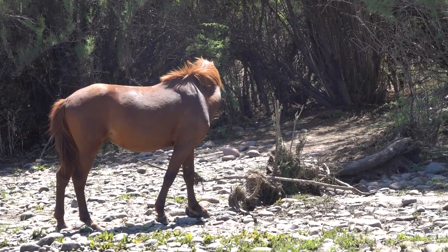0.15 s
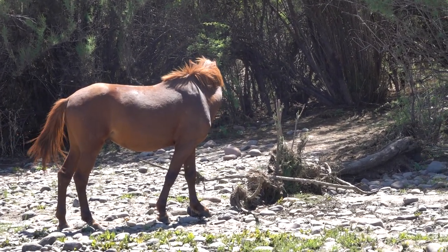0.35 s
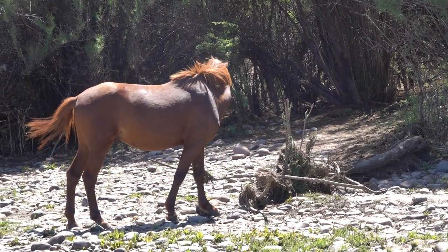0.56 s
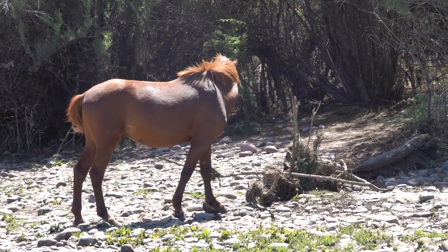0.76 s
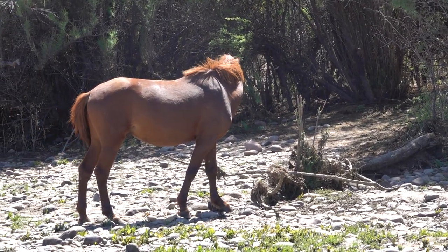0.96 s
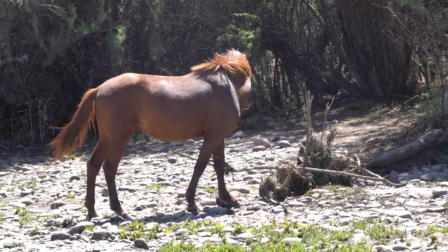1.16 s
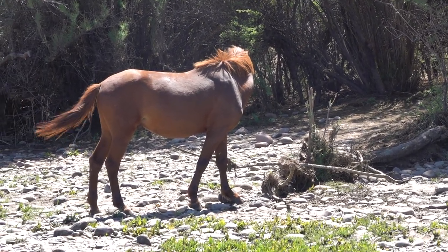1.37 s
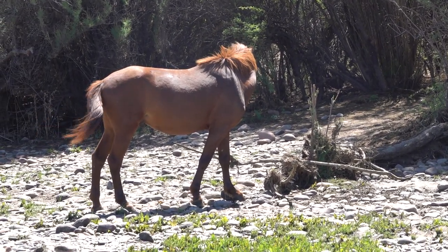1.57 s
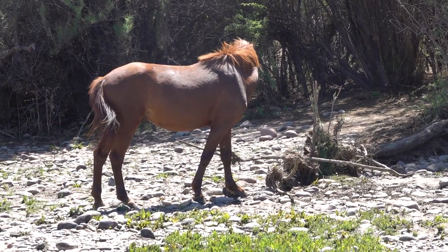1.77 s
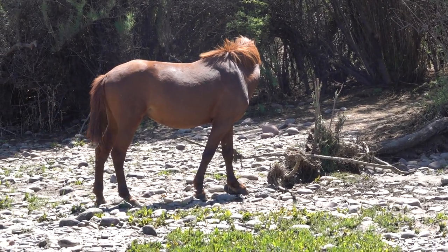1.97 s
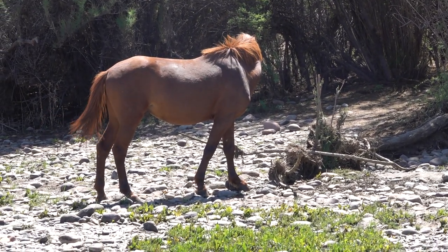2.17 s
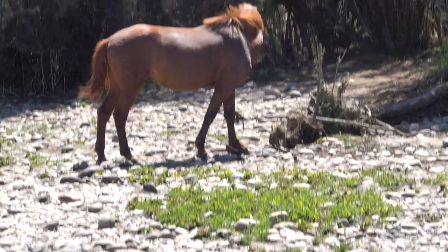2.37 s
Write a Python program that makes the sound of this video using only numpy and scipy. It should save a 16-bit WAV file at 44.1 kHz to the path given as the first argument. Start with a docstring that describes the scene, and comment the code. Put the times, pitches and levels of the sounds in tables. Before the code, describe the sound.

Wind noise dominates for 2.5 seconds: deep rumble, buffeting and fluttering, with sharp puffs around 0.3, 0.55-0.75, 1.1 and 1.6, and a strong gust at 2.4-2.5. A faint distant bird gives a buzzy whistle at 0.2-0.45, a rapid trill from 0.65 to 1.45, and a rasp near 1.95. From 1.4 a hand rubs and scuffs the housing, strongest at 1.7 and 2.05-2.2, ticking at 2.37. Water and leaves rush faintly.

```python
"""Gusty wind buffets both ports of a hand-held camera on a stony river bank: noise shaped by eddies and puffs.
In the second half a hand shifts on the camera: friction slips rub and scuff the housing, and it ticks.
A distant songbird gives a buzzy whistle, a rasp and a long trill: swept tones and noise bands with an echo.
Beneath lies a faint rush of water and leaves: coloured noise."""
import sys
import numpy as np
from scipy import signal
from scipy.fft import rfft, irfft, next_fast_len
from scipy.io import wavfile
from scipy.ndimage import uniform_filter1d, map_coordinates

SR = 44100
rng = np.random.default_rng(int(sys.argv[2]) if len(sys.argv) > 2 else 0)


def unload_audio(sound):
    """Save the sound as a 16-bit wav file, at the path given as the first command line argument."""
    columns = np.transpose(np.atleast_2d(sound))
    # keep every value between -1 and 1, then stretch to whole-number steps
    steps = np.round(np.clip(columns, -1, 1) * 32767)
    wavfile.write(sys.argv[1], SR, steps.astype(np.int16))


N = 111573
T = np.arange(N) / SR
SIDES = np.array([[.5], [-.5]])  # splits a left-right difference evenly


def amp(db):
    """The decibel law: level to amplitude gain."""
    return 10 ** (np.asarray(db) / 20)


def unit(x):
    """Power normalisation: scale to rms 1."""
    return x / np.sqrt(np.mean(x ** 2) + 1e-20)


def along(points, hz):
    """Interpolation of (frequency [Hz], value) points on a logarithmic frequency axis."""
    f, v = np.transpose(points)
    return np.interp(np.log(hz + 1), np.log(f + 1), v)


def curve(rows, axis=1):
    """Linear interpolation in time of one column of a timed table."""
    cols = np.transpose(rows)
    return np.interp(T, cols[0], cols[axis])


def wobble(rate):
    """Random modulation: a smooth curve through rate chance values a second."""
    return map_coordinates(rng.standard_normal(4096), [T * rate], mode="wrap")


def filtered(x, response):
    """Linear filtering: the spectrum of x times a response of frequency."""
    m = next_fast_len(N + 8192)
    return irfft(rfft(x, m) * response(np.fft.rfftfreq(m, 1 / SR)), m)[..., :N]


def ports(pair, colour, alike):
    """Coherence: two unrelated signals, coloured, mix into left and right of a given likeness, rms 1."""
    def response(hz):
        angle = np.arccos(np.clip(along(alike, hz), -.99, .99)) / 2
        return amp(along(colour, hz)) * [np.cos(angle), np.sin(angle)]
    mid, side = filtered(pair, response)
    return unit(np.array([mid + side, mid - side]))


def leading(x, phase):
    """Interaural-style phase: the left port leads the right by (frequency [Hz], lead [rad])."""
    return filtered(x, lambda hz: np.exp(1j * along(phase, hz) * SIDES))


def white():
    """White noise: two unrelated signals of flat spectrum."""
    return rng.standard_normal((2, N))


def steadied(x, size):
    """Envelope equalisation: noise over its running rms, size samples long."""
    return x / np.sqrt(np.abs(uniform_filter1d(np.mean(x ** 2, axis=0), size)) + 1e-6)


# deep rumble of the wind: (time [s], relative level [dB])
RUMBLE_LEVEL = [(0.0, -20), (0.47, -26), (0.51, -16), (0.57, -28.5), (0.61, -16.5), (0.7, -27.5),
                (0.91, -23.5), (1.1, -26), (1.3, -32.5), (1.5, -23), (1.72, -33), (1.88, -23.5),
                (2.3, -24.5), (2.41, -17.5), (2.53, -29.5)]
# its spectrum: (frequency [Hz], density [dB per Hz])
RUMBLE_SPECTRUM = [(15, -17.5), (27, -4.5), (38, -9.5), (52, -2.5), (70, -1.5), (100, 0), (140, -13),
                   (260, -41.5), (600, -84)]


def rumble():
    """Large-scale turbulence: deep noise almost alike at both ports."""
    noise = steadied(ports(white(), RUMBLE_SPECTRUM, [(60, 0.99)]), size=2600)
    return noise * amp(curve(RUMBLE_LEVEL) + 0.76)


# buffeting of the wind: (time [s], relative level [dB])
BUFFET_LEVEL = [(0.0, -17), (0.03, -27), (0.12, -25.5), (0.3, -20), (0.54, -19), (0.62, -15), (0.86, -29),
                (0.9, -19.5), (1.01, -28), (1.13, -17.5), (1.16, -32.5), (1.32, -26), (1.39, -23),
                (1.63, -25.5), (1.66, -19.5), (2.32, -21), (2.4, -24.5), (2.42, -17), (2.51, -17),
                (2.53, -29)]
# its spectrum: (frequency [Hz], density [dB per Hz])
BUFFET_SPECTRUM = [(50, -33), (90, -14.5), (125, -0.5), (200, -2), (280, -8.5), (400, -24), (700, -49),
                   (2000, -87)]


def buffet():
    """Mid-scale turbulence: gusting noise, slightly less alike at the two ports."""
    noise = steadied(ports(white(), BUFFET_SPECTRUM, [(200, 0.92)]), size=1500)
    return noise * amp(curve(BUFFET_LEVEL) - 1.1)


# flutter of small eddies: (time [s], relative level [dB])
FLUTTER_LEVEL = [(0.0, -35), (0.22, -38.5), (0.28, -30.5), (0.42, -38.5), (0.57, -32.5), (0.74, -28.5),
                 (0.83, -35), (1.04, -32.5), (1.16, -39), (1.33, -49), (1.41, -36), (1.77, -34),
                 (1.95, -30), (2.25, -28.5), (2.41, -34), (2.46, -24.5), (2.53, -36)]
# its spectrum: (frequency [Hz], density [dB per Hz])
FLUTTER_SPECTRUM = [(120, -35.5), (230, -4.5), (310, 0.5), (430, -4.5), (560, -13.5), (800, -28.5),
                    (1500, -46), (4000, -61.5), (12000, -89.5)]


def flutter():
    """Small-scale turbulence: noise in chance bursts, the least alike at the two ports."""
    eddies = white() * amp(4.6 * wobble(95))
    noise = steadied(ports(eddies, FLUTTER_SPECTRUM, [(300, 0.79), (700, 0.75)]), size=2000)
    return noise * amp(curve(FLUTTER_LEVEL) + 2)


# sharp puffs on the ports: (time [s], relative level [dB])
PUFF_EVENTS = [(.274, -18), (.311, -20), (.553, -18), (.621, -17), (.657, -15), (.666, -14), (.674, -12),
               (.729, -17), (.766, -22), (.948, -19), (1.055, -17), (1.099, -12), (1.134, -16), (1.59, -18),
               (2.46, -13), (2.497, -12)]
# spectrum of their noise: (frequency [Hz], density [dB per Hz])
PUFF_SPECTRUM = [(120, -19), (230, -7), (330, -6), (450, -3.5), (580, -15), (800, -24), (1500, -48.5),
                 (4000, -74.5), (12000, -97)]
PUFF_S, PUFF_DB = .003, -7  # Gaussian width and trim of the noise burst
PUSH_S, PUSH_DB = .0008, -1  # width and trim of the pressure pulse


def puffs():
    """Pressure impulse: each puff is a Gaussian burst of noise with a sharp pulse common to both ports."""
    bursts = sum(amp(db + PUFF_DB) * np.exp(-.5 * ((T - s) / PUFF_S) ** 2) for s, db in PUFF_EVENTS)
    noise = steadied(ports(white(), PUFF_SPECTRUM, [(300, 0.99)]), size=600) * bursts
    push = lambda u: (1 - u ** 2) * np.exp(-.5 * u ** 2)
    return noise + sum(amp(db + PUSH_DB) * push((T - s) / PUSH_S) for s, db in PUFF_EVENTS)


# eddies reach the left port first until the camera turns: (frequency [Hz], lead of the left port [rad])
EDDY_LEAD = [(40, .3), (90, .55), (170, 1), (300, 1.5), (500, 1.7), (900, 1.5)]
TURN_AT_S, TURN_S = 2.41, .03


def wind():
    """Convection of eddies: they pass one port, then the other; the ports trade places at the turn."""
    pair = rumble() + buffet() + flutter() + puffs()
    to_ends = np.minimum(T, T[-1] - T)
    pair = pair * np.sin(np.clip(to_ends / .008, 0, 1) * np.pi / 2) ** 2  # 8 ms fades at both ends
    left_first = leading(pair, EDDY_LEAD)
    turned = np.clip((T - TURN_AT_S) / TURN_S, 0, 1) * np.pi / 2
    return np.cos(turned) ** 2 * left_first + np.sin(turned) ** 2 * left_first[::-1]


# response of the camera housing: (frequency [Hz], density [dB per Hz])
HOUSING_SPECTRUM = [(200, -14.5), (500, 4), (800, -4), (1100, 3), (1400, 3), (1750, -2), (2100, -8),
                    (2550, -18.5), (2850, -13.5), (3050, -22), (3300, -16), (3700, -22), (4200, -36.5),
                    (5200, -29), (6500, -43), (8000, -48), (11000, -49.5), (15500, -51)]
# balance of the ports: (frequency [Hz], left minus right [dB])
HOUSING_BALANCE = [(300, -1.5), (700, -7), (1300, -3), (2400, -8.5), (4400, -16), (8000, -0.5)]
# coherence of the ports: (frequency [Hz], left-right likeness [1 = alike])
HOUSING_COHERENCE = [(400, 0.9), (700, 1), (1100, 0.98), (1800, 0.91), (2550, 0.96), (3100, 0.28),
                     (6800, 0.4), (12000, .6)]
# phase through the housing: (frequency [Hz], lead of the left port [rad])
HOUSING_LEAD = [(600, 1.6), (1000, .85), (1500, 0), (2100, -.8), (2900, -1.4), (3500, -2.7), (5000, -3),
                (6500, -5.3), (9000, -6.1)]


def slips(rate, scatter_db, smooth):
    """Stick-slip friction: rate uneven slips a second over a smooth hiss, heard through the housing."""
    sizes = amp(scatter_db * np.clip(rng.standard_normal(N), -2, 2))
    grains = (rng.random(N) < rate / SR) * sizes * np.sign(white())
    sound = ports(unit(grains) + smooth * white(), HOUSING_SPECTRUM, HOUSING_COHERENCE)
    sound = leading(sound, HOUSING_LEAD)
    return unit(filtered(sound, lambda hz: amp(along(HOUSING_BALANCE, hz) * SIDES)))


# rubbing of the hand: (time [s], level [dB])
RUB_LEVEL = [(0, -84), (1.3, -68), (1.44, -47.5), (1.6, -51), (1.73, -40.5), (1.79, -40), (1.85, -32.5),
             (1.93, -41), (2.01, -34), (2.13, -39.5), (2.24, -32.5), (2.33, -38), (2.42, -38),
             (2.47, -47.5)]
SLIPS_PER_S, SLIP_SCATTER_DB, RUB_SMOOTH, RUB_SWAY_DB = 1600, 3.5, .45, 1.5


def rub():
    """Sustained friction: a steady stream of slips whose level sways."""
    noise = steadied(slips(SLIPS_PER_S, SLIP_SCATTER_DB, RUB_SMOOTH), size=1200)
    return noise * amp(curve(RUB_LEVEL) + RUB_SWAY_DB * wobble(50))


# scuffs of the hand: (time [s], length [s], level [dB], brightness [dB per octave])
SCUFF_EVENTS = [(1.383, 0.0039, -36, -15), (1.42, 0.022, -36, -3), (1.635, 0.0069, -33.5, -6.5),
                (1.685, 0.0059, -34, 3), (1.7119, 0.0048, -22, -1.5), (1.721, 0.011, -32, -0.5),
                (1.828, 0.011, -49, 7), (1.967, 0.0049, -38, 0), (1.972, 0.0078, -35, 4),
                (2.052, 0.003, -33.5, 8), (2.061, .003, -31.5, 4), (2.0712, 0.0023, -23, -4),
                (2.0763, 0.0037, -20, 4), (2.083, 0.011, -27.5, -1.5), (2.162, 0.0093, -33.5, 3),
                (2.185, 0.0098, -29.5, 2), (2.192, 0.014, -23.5, -2.5), (2.211, 0.0034, -25, -4),
                (2.2152, 0.006, -21, -1), (2.225, .012, -37, 4.5)]
SCUFF_ATTACK_S, SCUFF_T60_S, SCUFF_COLOUR_DB = .001, .024, 2.5
SCUFF_SLIPS_PER_S, SCUFF_SCATTER_DB, SCUFF_SMOOTH = 1300, 3, .2


def scuffs():
    """Catch and release: short friction bursts with exponential decay, each with its own colour."""
    rough = slips(SCUFF_SLIPS_PER_S, SCUFF_SCATTER_DB, SCUFF_SMOOTH)
    out = 0
    for s, length, db, tilt_db in SCUFF_EVENTS:
        spot = SCUFF_COLOUR_DB * rng.standard_normal(28)  # chance colour of this scuff
        spot_hz = np.geomspace(500, 8000, len(spot))

        def colour(hz):
            tilt = tilt_db * np.log2(np.clip(hz, 500, 5000) / 1400)
            return amp(tilt + np.interp(hz, spot_hz, spot))
        attack = np.clip((T - s) / SCUFF_ATTACK_S, 0, 1)
        decay = amp(-60 * np.maximum(T - s - length, 0) / SCUFF_T60_S)
        out = out + amp(db) * attack * decay * steadied(filtered(rough, colour), size=220)
    return out


# hiss of sliding skin: (time [s], level [dB])
SLIDE_LEVEL = [(0, -92), (1.3, -76.5), (1.42, -69.5), (1.6, -73.5), (1.685, -65), (1.76, -74.5),
               (2.0, -61.5), (2.17, -59), (2.31, -63), (2.41, -54), (2.47, -59.5)]
# its spectrum: (frequency [Hz], density [dB per Hz])
HISS_SPECTRUM = [(2000, -16), (3500, 10.5), (5500, 7), (7500, 1.5), (9000, 0), (11000, 2), (12500, -3),
                 (14500, 2.5), (16000, -3.5)]
HISS_SWAY_DB = .9


def slide():
    """Fine-grained friction: skin sliding gives a high, flickering noise."""
    grain = white() * amp(1.8 * wobble(280))
    hiss = ports(grain, HISS_SPECTRUM, [(4000, 0.14), (12000, 0.53)])
    return hiss * amp(curve(SLIDE_LEVEL) + HISS_SWAY_DB * wobble(59))


def hand():
    """Superposition: the dragging hand rubs, scuffs and slides."""
    return rub() + scuffs() + slide()


# small ticks of the housing under the fingers: (time [s], level [dB])
TICK_EVENTS = [(1.131, -51), (1.345, -56), (2.373, -36)]
TICK_T60_S = .02


def ticks():
    """Impulsive release: the housing gives a little under the grip, in bright, fast-decaying friction noise."""
    shape = sum(amp(db - 60 * np.abs(T - s) / TICK_T60_S) * (T > s) for s, db in TICK_EVENTS)
    noise = slips(SLIPS_PER_S, SLIP_SCATTER_DB, RUB_SMOOTH)
    return shape * unit(filtered(noise, lambda hz: np.clip(hz / 3000, 0, 1) ** 2))


def tone(hz):
    """Frequency modulation: a sine of rms 1 whose phase is the running sum of its pitch."""
    return np.sqrt(2) * np.sin(2 * np.pi * np.cumsum(hz) / SR)


def during(rows):
    """Gating: open between the first and last times of a table."""
    return (T > rows[0][0]) * (T < rows[-1][0])


# the whistle: (time [s], pitch [Hz], level [dB])
WHISTLE_PATH = [(.2005, 3520, -78), (.222, 3520, -61), (.26, 3520, -52.5), (.292, 3490, -58),
                (.312, 3490, -55.5), (.37, 3510, -58), (.38, 3350, -67), (.415, 3290, -63),
                (.445, 3150, -80)]
BUZZ_HZ, BUZZ_RISE_HZ, BUZZ_DIP_DB, WHISTLE_ROUGH_HZ = 68.7, 200, 15, 35


def whistle():
    """Joint amplitude and frequency modulation: quick pulses, each rising in pitch, make the buzz."""
    cycle = ((T - WHISTLE_PATH[0][0]) * BUZZ_HZ) % 1
    pulses = amp(-BUZZ_DIP_DB * np.cos(np.pi * cycle) ** 4)
    hz = curve(WHISTLE_PATH, axis=1) + BUZZ_RISE_HZ * (cycle - .5) + WHISTLE_ROUGH_HZ * wobble(300)
    return tone(hz) * amp(curve(WHISTLE_PATH, axis=2)) * pulses * during(WHISTLE_PATH)


# trill notes: (time [s], level [dB])
TRILL_NOTES = [(0.6468, -64), (0.6983, -61.5), (0.7432, -58.5), (0.791, -56.5), (0.8345, -56.5),
               (0.8822, -54), (0.927, -56), (0.9742, -55), (1.0223, -57.5), (1.067, -58), (1.1149, -57.5),
               (1.1644, -64), (1.2104, -59.5), (1.2597, -61), (1.3069, -58.5), (1.3566, -56.5),
               (1.405, -59), (1.4538, -57.5)]
# downward sweep of each note: (time from its start [s], pitch [Hz], level relative to the note [dB])
NOTE_SWEEP = [(0, 6300, -26), (.008, 5200, -14.5), (.014, 4700, -14), (.018, 4000, -22), (.021, 3720, -2),
              (.0265, 3560, 0), (.031, 3470, -18)]
NOTE_LEAD_S = 0.0205  # the sweep starts this long before the note's listed time
SWEEP_ROUGH, SWEEP_JITTER_PER_S = .32, 900


def trill():
    """Falling frequency sweeps: pitch jitter shrinks with the fall, so notes start rough and end clean."""
    song = 0
    for s, db in TRILL_NOTES:
        note = np.array(NOTE_SWEEP) + [s - NOTE_LEAD_S, 0, db]
        hz = curve(note, axis=1)
        jitter = SWEEP_ROUGH * (hz - hz.min()) * wobble(SWEEP_JITTER_PER_S)
        song = song + tone(hz + jitter) * amp(curve(note, axis=2)) * during(note)
    return song


# lone falling chips: (time [s], level [dB])
CHIP_EVENTS = [(.146, -73)]
CHIP_S, CHIP_START_HZ, CHIP_END_HZ = .014, 6000, 4000


def chips():
    """Linear chirp: a short falling tone under a half-sine envelope."""
    song = 0
    for s, db in CHIP_EVENTS:
        u = np.clip((T - s) / CHIP_S, 0, 1)
        song = song + amp(db) * np.sin(np.pi * u) * tone(np.interp(u, [0, 1], [CHIP_START_HZ, CHIP_END_HZ]))
    return song


# rasping notes: (time [s], length [s], centre [Hz], width [octaves], level [dB])
RASP_EVENTS = [(.376, .06, 3300, .1, -69), (.376, .06, 4600, .15, -71), (.366, .075, 6250, .09, -71.5),
                (1.193, .068, 6300, .19, -70), (1.935, .2, 5800, .11, -63)]
RASP_ROUGH_DB = 2.5


def rasps():
    """Band-limited noise: a narrow band with a fluctuating level is heard as a rasp."""
    song = 0
    for s, length, centre, width, db in RASP_EVENTS:
        band = lambda f: 1 / (1 + (np.log2((f + 1) / centre) / width) ** 2)
        noise = unit(filtered(rng.standard_normal(N), band))
        shape = np.sqrt(np.abs(np.sin(np.pi * np.clip((T - s) / length, 0, 1))))
        song = song + amp(db + RASP_ROUGH_DB * wobble(260)) * noise * shape
    return song


# direction of the bird: (frequency [Hz], lead of the left port [rad])
BIRD_LEAD = [(2500, 1.2), (3500, 1.7), (3900, 2), (4650, 5.4), (6000, 6.25)]
BIRD_ROOM_DB, TREES_T60_S = -13, 0.61  # level and decay time of the echo


def bird():
    """Direct and diffuse sound: the song, plus its convolution with the decaying echo of the trees."""
    song = whistle() + trill() + chips() + rasps()
    tail = white() * amp(-60 * T / TREES_T60_S)
    echo = signal.fftconvolve(song[None], tail / np.linalg.norm(tail[0]), axes=1)[:, :N]
    return leading(song, BIRD_LEAD) + amp(BIRD_ROOM_DB) * echo


# rush of water and leaves: (time [s], mean level of the two ports [dB])
RUSH_LEVEL = [(.48, -55), (.58, -54.5), (.76, -52.5), (.88, -55.5)]
# its spectrum: (frequency [Hz], density [dB per Hz])
RIVER_SPECTRUM = [(200, -17), (700, 2.5), (1200, -1.5), (1700, -8), (2500, -21.5), (3500, -23.5),
                  (5000, -30), (8000, -36.5), (15000, -38.5)]
RIVER_PAN_DB = -3.5  # left minus right


def river():
    """Many independent small sources: water and leaves sum to a faint noise that swells a little by chance."""
    rush = ports(white(), RIVER_SPECTRUM, [(600, 0.11), (1400, 0.62), (3000, 0.02), (9000, 0.83)])
    return rush * amp(curve(RUSH_LEVEL) + 1.1 * wobble(36) + RIVER_PAN_DB * SIDES)


def scene():
    """Linear superposition: the pressures of all sources add at the camera."""
    return wind() + hand() + ticks() + bird() + river()


TOP_HZ = 15780


def record(dry):
    """Band limitation: the camera keeps nothing above its top frequency."""
    return filtered(dry, lambda hz: hz < TOP_HZ)


dry = scene()
out = record(dry)
unload_audio(out)
```